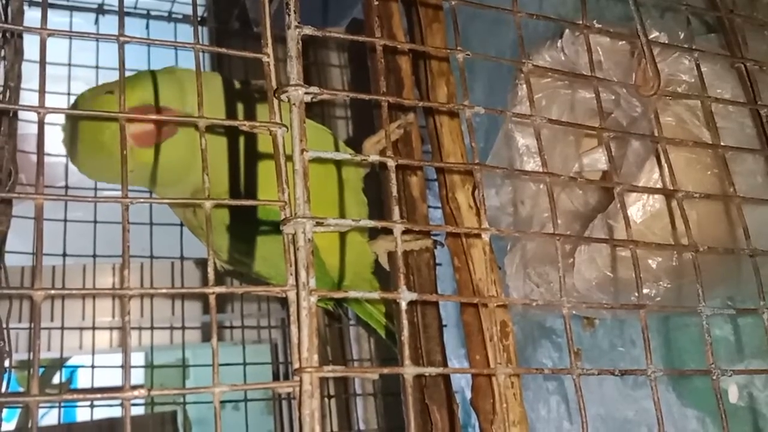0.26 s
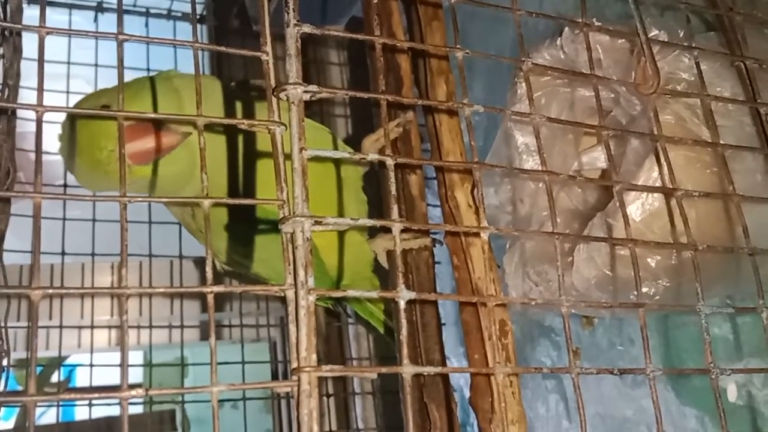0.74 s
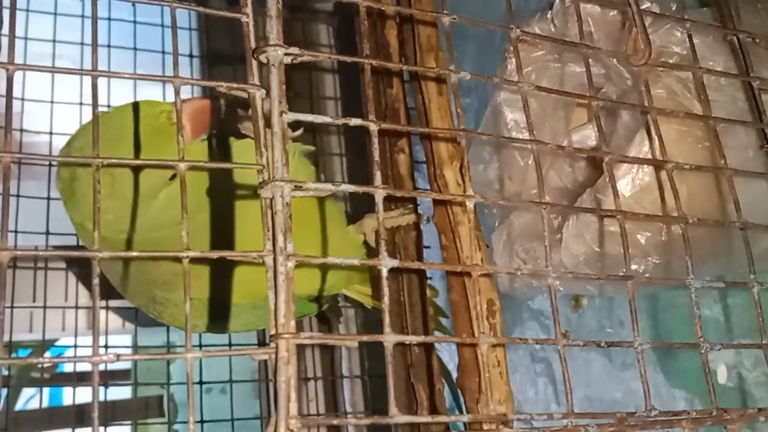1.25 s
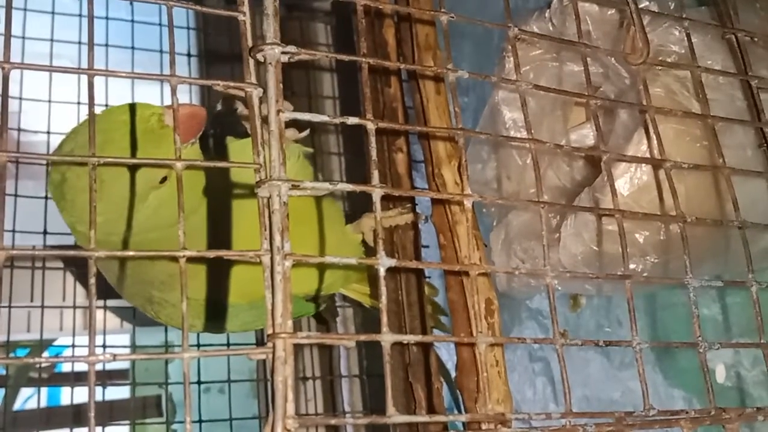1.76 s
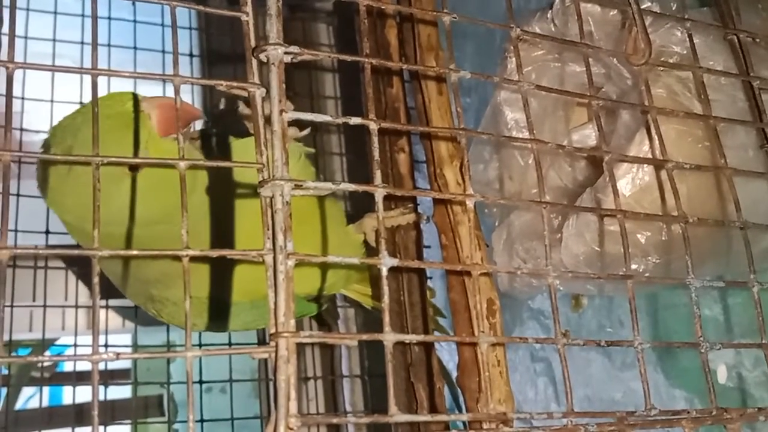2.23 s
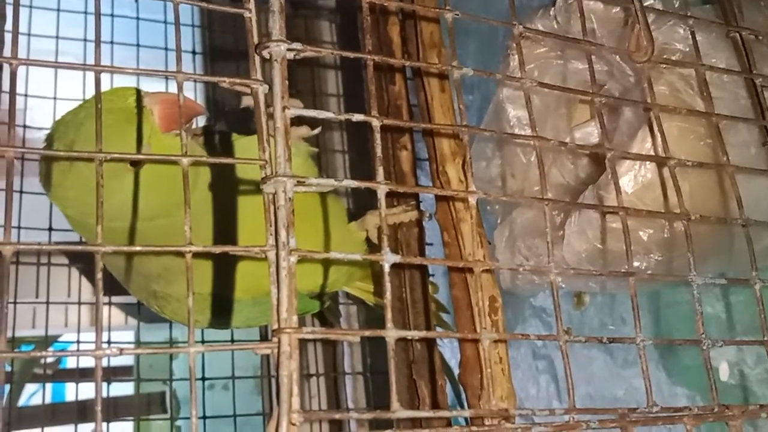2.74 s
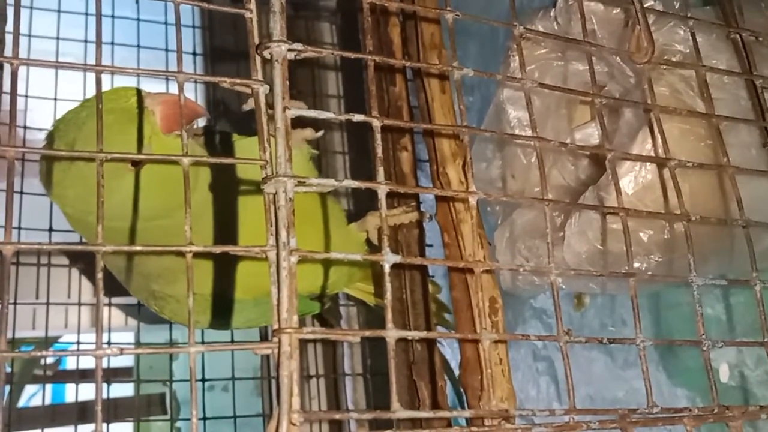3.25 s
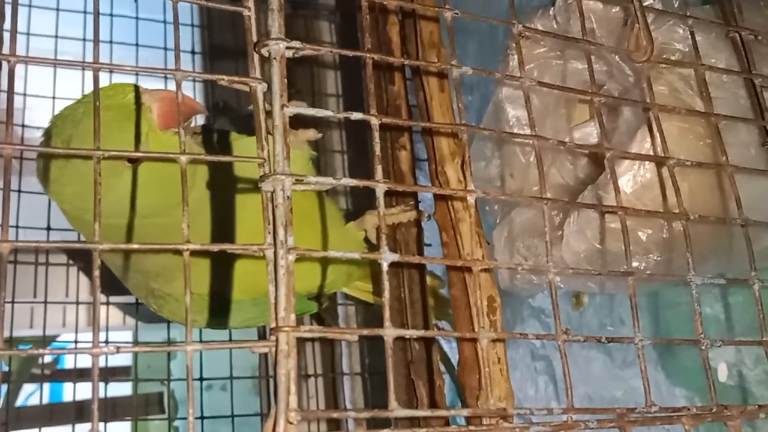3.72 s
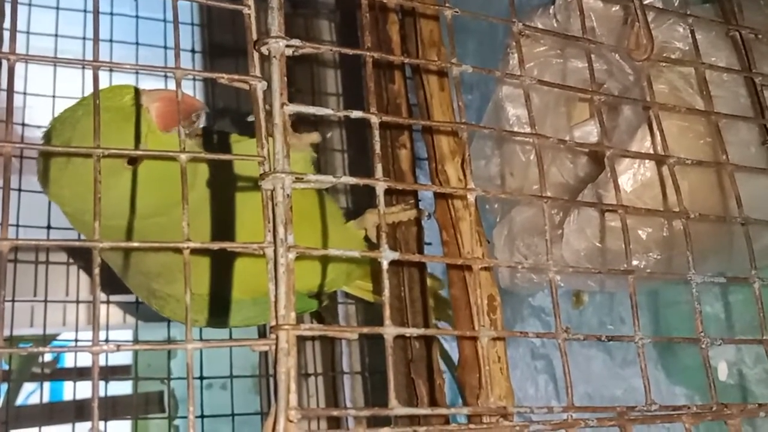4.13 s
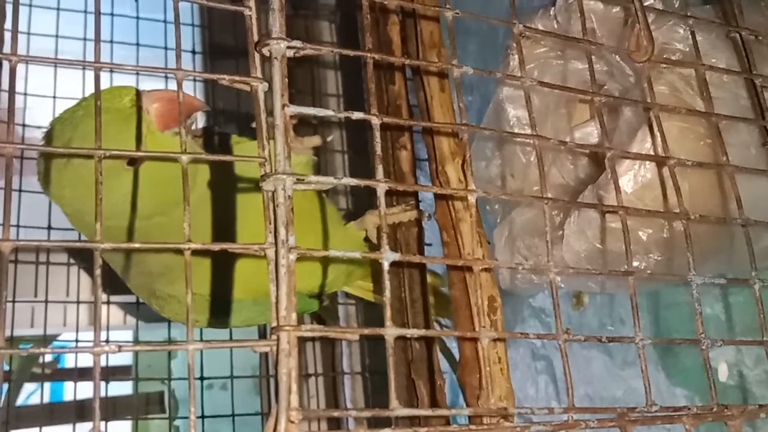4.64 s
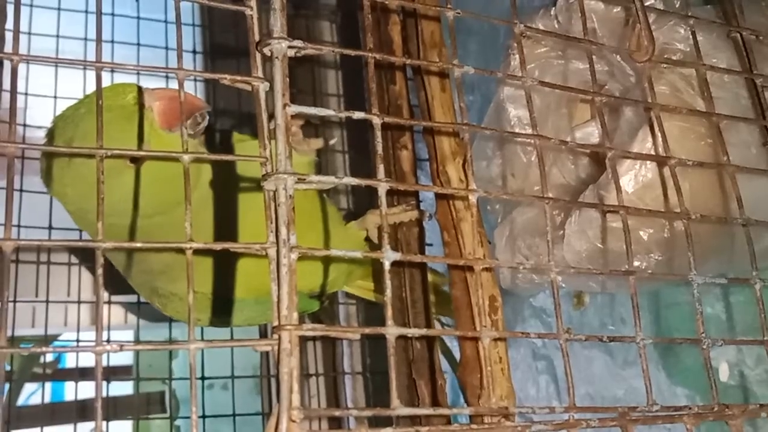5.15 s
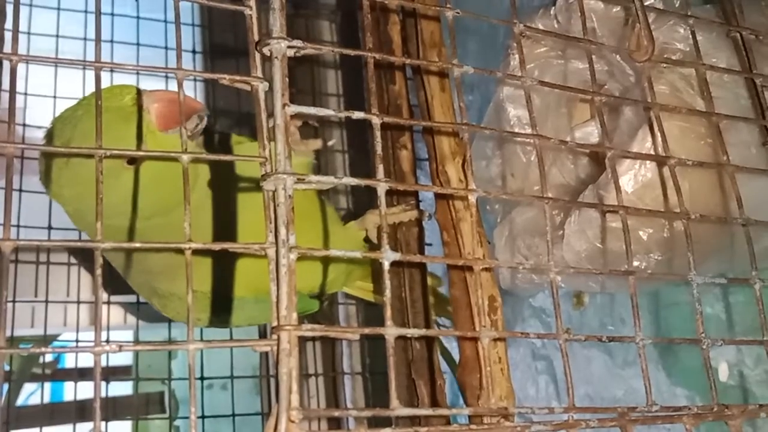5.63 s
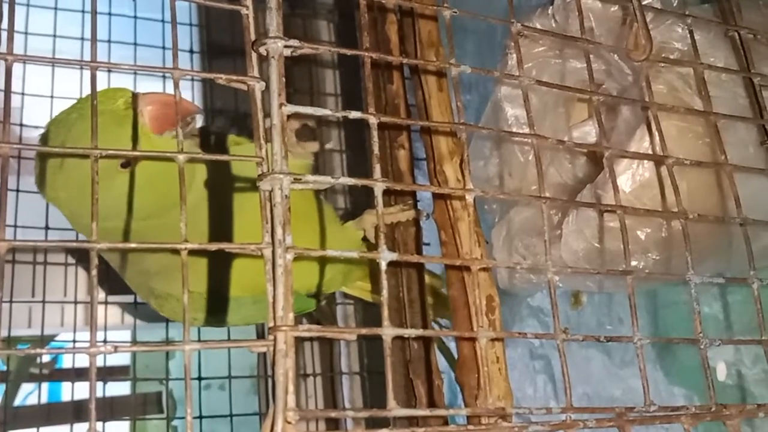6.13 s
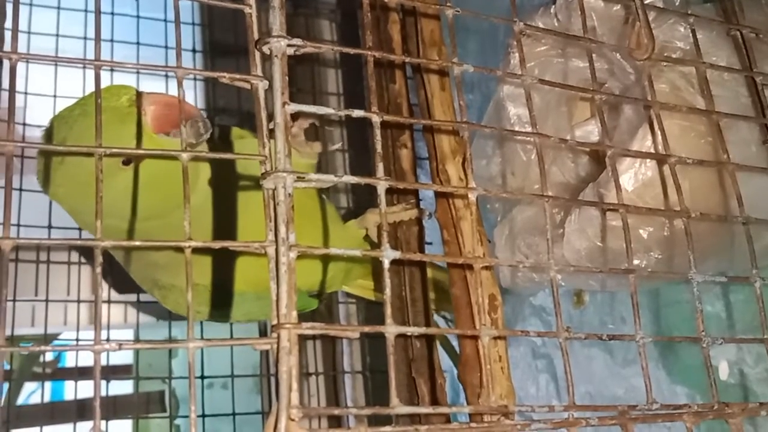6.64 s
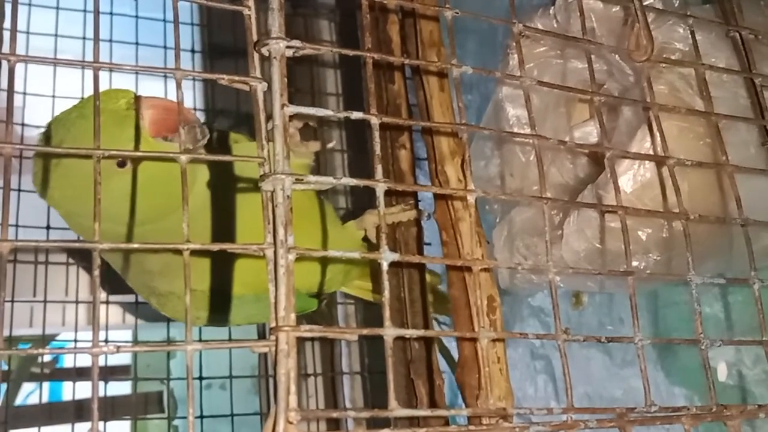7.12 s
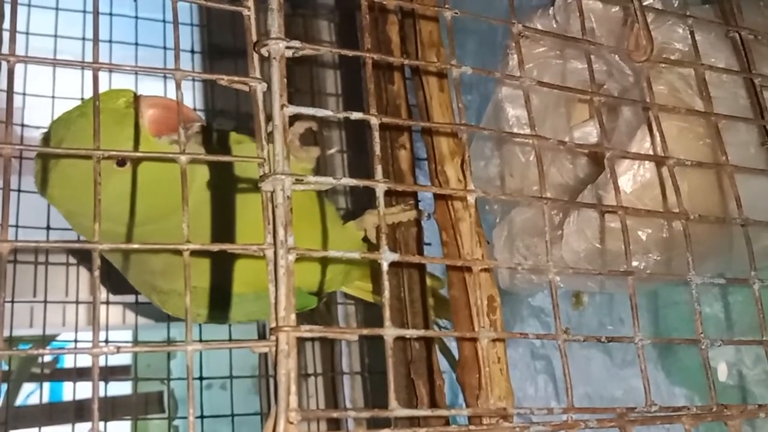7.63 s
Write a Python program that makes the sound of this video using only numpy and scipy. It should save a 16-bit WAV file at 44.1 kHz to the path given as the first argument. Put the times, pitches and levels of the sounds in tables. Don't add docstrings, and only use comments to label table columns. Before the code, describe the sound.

A caged parakeet is heard close to a handheld phone, with faint far street hiss, hollow hum and low rumble that pump with its voice. A soft handling bump opens the scene. At 0.9 s comes a quick trill of three pulses, then small, muted falling chirps near 1.6, 2.3 and 2.85 s. A throaty cluck at 3.0 leads to a faint low whistle at 3.4, a stronger cluck at 3.6 and a high chip at 3.75. Hoarse rasps alternate with two upward whistles at 4.0 and 4.3-4.5 s, then a soft chirp at 4.75. Loud calls follow at 5.0-5.4 and 5.6-6.05 s, dipping, swooping up and plunging. Two higher, piercing calls snap in at 6.36 and 7.1 s, climbing then dropping, with clucks before them and beak ticks. Near walls add a short, bright smear; fingers thump softly around 5.6-6.3 s. A last cluck ends it at 7.8 s.

```python
import sys
import numpy as np
from scipy import signal
from scipy.fft import rfft, irfft
from scipy.io import wavfile
from scipy.ndimage import uniform_filter1d, minimum_filter1d, map_coordinates

SR = 44100
rng = np.random.default_rng(int(sys.argv[2]) if len(sys.argv) > 2 else 0)


def digitize_waveform(pressure):
    field = np.atleast_2d(pressure).T
    bounded = np.clip(field, -1, 1)
    quanta = np.round(bounded * 32767).astype(np.int16)
    wavfile.write(sys.argv[1], SR, quanta)


def how_loud(loudness_db):
    steps = np.asarray(loudness_db, float) / 20
    return 10 ** steps


N = 347508

# frequency in Hz, level in dB per Hz.
STREET_HISS = [(500, -40), (700, -20), (1000, -8), (1400, 0), (2000, -2), (2500, -18), (3400, -20),
               (4450, -24), (4800, -35), (5400, -31), (7600, -24), (8800, -30), (9300, -60), (16000, -72)]
# frequency in Hz, level in dB per Hz.
STREET_HUM = [(150, -49.5), (220, -10), (320, 12.5), (420, -23), (520, -30.5), (700, -41), (2500, -91.5)]
# frequency in Hz, level in dB per Hz.
LOW_RUMBLE = [(20, -38.5), (40, -30.5), (65, -8.5), (90, 2), (118, 10.5), (150, -20.5), (220, -23),
              (300, -41.5), (1000, -90.5)]
# frequency in Hz, level in dB per Hz.
GAP_AIR = [(350, -38), (480, -8.5), (650, 25), (850, -18), (1100, -36.5), (2500, -79.5)]
# time in seconds, level in dB.
TRAFFIC_SWELL = [(0, -76), (.3, -71.5), (.9, -67), (1.5, -73.5), (2.75, -78), (3.4, -71.5), (3.75, -60),
                 (4.0, -76.5), (4.4, -49.5), (4.6, -66.5), (5, -58.5), (5.6, -59.5), (6.1, -78), (6.4, -62),
                 (6.6, -90), (7.15, -60.5), (7.3, -75), (7.88, -77)]
# centre in seconds, rumble level in dB, half width in seconds.
HAND_SHIFTS = [(.1, -67, 0.125), (2.39, -45, 0.013), (2.86, -56, 0.018), (4.45, -65.5, 0.11),
               (5.08, -63.5, 0.071), (5.618, -49, 0.064), (5.949, -59.5, 0.2), (6.381, -71, 0.103),
               (6.889, -65, 0.0387)]
# start in seconds, peak in dB, pitch in Hz, half width in seconds.
FINGER_THUMPS = [
    (0.045, -31, 95.8, 0.0051),
    (0.159, -63, 113, 0.016),
    (5.57, -32.5, 116, 0.0055),
    (5.701, -45.5, 85, 0.03),
    (6.127, -50.5, 108.8, 0.008),
    (6.321, -42.5, 72.7, 0.0127),
]
# start in seconds, level in dB.
BEAK_TICKS = [(.056, -48), (5.14, -25), (6.54, -33), (7.16, -31), (6.46, -27), (6.48, -21), (7.22, -21)]

# delay in seconds, level in dB.
WALL_ECHOES = [(.0088, -16), (.0122, -14), (.0157, -18), (.0187, -19), (.0244, -17)]
# frequency in Hz, time to fall 60 dB in seconds.
WALL_DECAY = [(500, .1), (1500, .27), (3000, .32), (5000, .27), (12000, .25)]
# frequency in Hz, level in dB.
REFLECTION_COLOUR = [(600, -10), (900, -7), (1500, 0), (2400, -2), (3200, 1), (4500, 1), (6000, -1),
                     (8000, 0), (12000, -3)]
# start in seconds, gain in dB, time held in seconds.
SUPPRESSOR_BITES = [(.981, -3, .5), (1.0, -3, .5), (3.1, -7, .2), (3.5, -5, .09), (3.8, -6, .085),
                    (4.14, -6, .05), (4.19, -10, .025), (4.53, -3, .09), (4.57, -6, .05), (5.455, -3, .04),
                    (5.495, -7, .06), (6.08, -5, .22), (6.782, -6, .25), (7.541, -7, .28)]

# start in seconds, peak in dB, length in seconds, first and last Hz, roughness 0-1.
LEAD_IN_BREATH = (.878, -55, .045, 1050, 1100, .7)
# start in seconds, peak in dB, length in seconds.
TRILL_PULSES = [
    (.9215, -17, 0.011),
    (0.9453, -14, 0.012),
    (0.9705, -17, 0.011),
]
# frequency in Hz, level in dB.
TRILL_THROAT = [(500, -23), (1050, 0), (2150, 6.5), (3200, 1.5), (4300, 5), (5400, -15), (7300, -11.5),
                (9500, -12.5), (16000, -43.5)]
# time in seconds, pitch in Hz, effort in dB, tongue 0 forward to 1 back,
# brightness of the higher partials in dB.
SOFT_CHIRPS = [
    [(1.54, 680, -74, 0.2, -13.5), (1.6, 744, -75, 0.7, -26.5), (1.64, 822, -70, 1, -26),
     (1.66, 803.4, -41.5, 0.54, -18), (1.69, 826, -30, 0.34, -16), (1.701, 772, -32, 0.48, -11),
     (1.712, 684, -36, 0.83, -20.5)],
    [(2.236, 666, -75, 0.24, -12.5), (2.296, 734, -77.5, 0.75, -24), (2.336, 824, -69, 0.9, -26),
     (2.356, 818, -40, 0.4, -25), (2.385, 820, -30, 0.16, -16), (2.396, 786, -34.5, 0.7, -9.5),
     (2.407, 676, -38, 0.8, -14)],
    [(2.803, 920, -71, 0.6, -26), (2.82, 885, -55, 1, -14), (2.86, 850, -33, 0.26, -26),
     (2.895, 858, -35.5, 0.42, -27), (2.92, 820, -70, 0.95, -24)],
    [(4.73, 940, -46, 1, -18), (4.75, 885, -47.5, 0.99, -5.5), (4.79, 850, -35.5, 0.52, -17),
     (4.815, 742, -34.5, 0.38, -21), (4.838, 600, -47.5, 0.8, -24)],
]
# frequency in Hz, level in dB.
SOFT_TONGUE_BACK = [(600, 4.5), (900, 9.5), (1600, 8.5), (2500, -9)]
# frequency in Hz, level in dB.
SOFT_TONGUE_FORWARD = [(600, 7), (900, -16), (1600, -11.5), (2500, 2.5)]
# levels in dB of partials 1, 2 and 3.
SOFT_MEMBRANES = [-3, -3.5, -9]
# frequency in Hz, level in dB.
SHUT_BEAK = [(3200, -16), (4600, -11), (5500, -15), (7000, 9), (9000, -10), (11500, -18), (12500, -32.5)]
# start in seconds, peak in dB, length in seconds, first and last Hz.
THROAT_RASPS = [
    (1.699, -47, 0.017, 805, 636),
    (2.389, -59, .024, 764, 762),
    (3.887, -28.5, 0.057, 539, 616),
    (4.214, -31, 0.075, 547, 506),
    (4.619, -28, 0.033, 612, 606),
]
# frequency in Hz, level in dB.
RASP_THROAT = [(400, -24.5), (560, 2), (900, -3.5), (1600, 4), (2300, 9.5), (3300, -10.5), (4600, -16),
               (5600, -53), (7000, -8.5), (8200, -28.5), (10000, -21.5), (12000, -45)]
# start in seconds, peak in dB, length in seconds, share of the usual pitch.
THROAT_CLUCKS = [
    (3.043, -18.5, .00924, 1),
    (3.602, -14, .013, .89),
    (4.941, -20.5, .0076, 1),
    (5.564, -17.5, .009, 1),
    (6.311, -19.5, .01, .98),
    (7.04, -21, .0085, 1),
    (7.834, -20, .0087, 1),
]
# frequency in Hz, level in dB.
CLUCK_THROAT = [(400, -32.5), (650, -8), (1200, -10), (1700, -22), (2400, 7), (3200, -8.5), (4200, -7.5),
                (5500, -15), (7200, -17.5), (9000, -28.5), (12000, -36), (16000, -56.5)]
# start in seconds, peak in dB, length in seconds, first and last Hz.
THROAT_MURMURS = [
    (3.305, -56.5, 0.12, 1072, 1130),
    (4.975, -40, 0.21, 628, 682),
    (5.61, -40.5, 0.19, 669, 620),
]
# frequency in Hz, level in dB.
HALFWAY_LINES = [(500, -27), (700, -20.5), (1900, -13.5), (3200, -6.5), (4400, -12), (5600, -6),
                 (7000, -23.5), (9000, -39.5)]

# frequency in Hz, level in dB.
LOUD_TONGUE_BACK = [(900, 26.5), (1300, -20), (1800, -18), (2300, 18), (2900, 10), (3700, 5), (4500, -24),
                    (6300, -7.5), (7000, -8.5)]
# frequency in Hz, level in dB.
LOUD_TONGUE_FORWARD = [(900, -33), (1300, 11), (1800, 25.5), (2300, -26), (2900, -25), (3700, -11),
                       (4500, 23), (6300, 12), (7000, 5.5)]
# time in seconds, pitch in Hz, effort in dB, tongue 0 forward to 1 back,
# brightness of the higher partials in dB.
SHORT_WHISTLES = [
    [(3.345, 1062, -86, 1.0, -21), (3.37, 992, -64, 1.0, 20), (3.4, 918, -53.5, 0.75, 19),
     (3.43, 876.7, -50, 0.65, 18), (3.46, 863.3, -44.5, 0.59, 18), (3.485, 868, -46.5, 0.63, 10.5),
     (3.5, 950, -76, 0.85, -12)],
    [(3.68, 2035, -73, 0.83, 3), (3.71, 2040, -49.5, 0.91, -5.5), (3.74, 2190, -41.5, 0.7, -18),
     (3.758, 2274, -31.5, 0.74, -11.5), (3.775, 2130, -55, 1, -14)],
]
# frequency in Hz, level in dB.
BEAK_SHORT = [(3000, 7.5), (3950, -0.5), (4660, 7.5), (5400, -1.5), (6260, -5), (7000, -13), (8800, -17),
              (10300, -22), (11500, -40), (15500, -58)]
# time in seconds, pitch in Hz, effort in dB, tongue 0-1, brightness in dB.
RISING_CALLS = [
    [(4.01, 1223, -48, 0.41, -30), (4.03, 1184, -40, 0.42, -23), (4.05, 1271, -32, 0.52, -11),
     (4.07, 1404, -30, 0.5, -10), (4.082, 1660, -33.5, 0.65, -8), (4.092, 1794, -36.5, 0.61, -0.5)],
    [(4.3, 1275, -42, 0.28, -31), (4.31, 1186, -40.5, 0.47, -24.5), (4.345, 1191, -36, 0.4, -28.5),
     (4.41, 1257, -29, 0.33, -7), (4.44, 1340, -28, 0.49, -6.5), (4.465, 1410, -23.5, 0.5, -2),
     (4.497, 1437, -29.5, 0.52, -4), (4.51, 1506, -46, 0.67, -14)],
]
# levels in dB of partials 1, 2 and 3.
RISING_MEMBRANES = [2.5, 17.5, 2]
# frequency in Hz, level in dB.
BEAK_RISING = [(4500, 3), (5300, -10), (6300, -10), (7100, -11.5), (8500, -21.5), (10000, -6.5),
               (11500, -28), (13000, -34), (15500, -32)]
# time in seconds, pitch in Hz, effort in dB, tongue 0-1, brightness in dB.
LONG_LOW_CALLS = [
    [(4.978, 1548, -55.5, 0.31, -4.5), (5.01, 1290, -49, 0.021, -31), (5.085, 1220, -37, 0.099, -4),
     (5.13, 1148, -30.5, 0.5, 7), (5.18, 1236, -23.5, 0.58, -3), (5.255, 1740, -30, 0.53, -2),
     (5.29, 1819, -37.5, 0.28, 6.5), (5.36, 1571, -26, 0.56, -4), (5.41, 1370, -25, 0.61, -5.5)],
    [(5.612, 1426, -59, 0, 2), (5.65, 1339, -49, 0.015, 0.5), (5.7, 1200, -36.5, 0.14, 1),
     (5.74, 1203, -30.5, 0.36, 14), (5.79, 1328, -24.5, 0.58, -2), (5.86, 1703, -27, 0.58, -1.5),
     (5.91, 1958, -41, 0.12, 4), (5.985, 1619, -26.5, 0.61, -5), (6.04, 1399, -23.5, 0.58, -0.5)],
]
# frequency in Hz, level in dB.
BEAK_LOW = [(3000, 15), (4800, 10), (5600, -3), (6300, -10), (7200, -12.5), (8100, -41), (8900, -17),
            (9600, -26), (10800, -16.5), (12700, -36.5), (13700, -39), (15500, -34.5)]
# frequency in Hz, level in dB.
LOW_PLUNGE_THROAT = [(450, -35), (650, -5), (900, -17), (1500, -12), (2000, -14), (2450, 9), (3000, -6.5),
                     (4200, -15), (6000, -23.5), (8800, -23), (11000, -32), (15500, -53)]
# time in seconds, pitch in Hz, effort in dB, tongue 0-1, brightness in dB.
LONG_HIGH_CALLS = [
    [(6.365, 2009, -43.5, 0.0, -1), (6.385, 1906, -38, 0.19, 7.5), (6.42, 1830, -36.5, 0.3, 13),
     (6.44, 1776, -26, 0.58, -1), (6.48, 1893, -30, 0.53, 6), (6.585, 2331, -19.5, 0.68, -9.5),
     (6.61, 2237, -23, 0.64, -5), (6.655, 1910, -37, 0.57, 3), (6.738, 1481, -32, 0.54, 3.5)],
    [(7.098, 2125, -41, 0.88, -31), (7.112, 1844, -47.5, 0.075, 11), (7.15, 1765, -30, 0.56, 2),
     (7.185, 1792, -28.5, 0.46, 8.5), (7.225, 1879, -30.5, 0.6, 3), (7.262, 2091, -24.5, 0.46, -1),
     (7.352, 2245, -22, 0.67, -5.5), (7.41, 1936, -37.5, 0.52, 5), (7.498, 1451, -30.5, 0.58, 5.5)],
]
# levels in dB of partials 1, 2 and 3.
HIGH_MEMBRANES = [-3.5, 17.5, 3]
# frequency in Hz, level in dB.
BEAK_HIGH = [(1760, -30), (3000, 13.5), (3950, -1), (4660, 12), (6260, -0.5), (6940, 1.5), (8290, -26),
             (10600, -25), (12700, -49.5), (14300, -44), (15500, -34)]
# start in seconds, peak in dB, length in seconds,
# first and last Hz, roughness 0-1.
HIGH_SNAPS = [
    (6.361, -19, 0.017, 2473, 1986, 0.3),
    (7.095, -26.5, 0.019, 2406, 1986, 0.1),
]
# frequency in Hz, level in dB.
HIGH_PLUNGE_THROAT = [(450, -21), (650, -9), (900, -21), (1500, -15), (2200, -6.5), (2900, 4), (4000, -1.5),
                      (5500, -24), (7500, -7.5), (9000, -28), (10000, -44), (15000, -35)]
# centre in Hz, width in Hz, depth in dB.
MIC_PORT_DIPS = [(6300, 216, -9.5), (7760, 290, -7.5), (13600, 400, -6.5)]


def unit(x):
    return x / np.sqrt(np.mean(x ** 2) + 1e-20)


def along(points, hz):
    f, value = np.transpose(points)
    return np.interp(np.log(hz + 1), np.log(f + 1), value)


def wobble(size, rate):
    knots = rng.standard_normal(size // 20 + 4)
    return map_coordinates(knots, [np.arange(size) * min(rate, 2000) / SR])


def add(track, s, x):
    part = track[round(s * SR):][:len(x)]
    part += x[:len(part)]


def loudness_db(x, linger_s):
    span = round(.011 * SR)
    power = uniform_filter1d(uniform_filter1d(x ** 2, span), span)
    keep = np.exp(-1 / (linger_s * SR))
    return 10 * np.log10(np.abs(signal.lfilter([1 - keep], [1, -keep], power)) + 1e-10)


def suppressor_db(voice):
    low_voice_hz, opens_from_db, opens_db = 1420, -75, 11.5
    ducks_from_db, ducks = -30, .5
    hz = np.fft.rfftfreq(N, 1 / SR)
    low = irfft(rfft(voice) / (1 + (hz / low_voice_hz) ** 12), N)
    opens = np.clip((loudness_db(low, .005) - opens_from_db) / 18, 0, 1)
    return opens_db * opens - ducks * np.maximum(loudness_db(voice, .0036) - ducks_from_db, 0)


def rush(spectrum, patchy_db):
    hz, _, z = signal.stft(rng.standard_normal(N), SR, nperseg=512)
    field = uniform_filter1d(rng.standard_normal(z.shape), size=2, axis=0)
    field = uniform_filter1d(field, size=15, axis=1)
    z = z * how_loud(patchy_db * unit(field) + along(spectrum, hz)[:, None])
    return unit(signal.istft(z, SR, nperseg=512)[1][:N])


def street(voice):
    rest_hiss_db, rest_rumble_db, upper_hz, upper_opens = -65.5, -79.5, 2600, .6
    now, gate_db = np.arange(N) / SR, suppressor_db(voice)
    hiss_db = rest_hiss_db + gate_db
    hiss = rush(STREET_HISS, patchy_db=4.5)
    upper = irfft(rfft(hiss) * (np.fft.rfftfreq(N, 1 / SR) > upper_hz), N)
    upper_db = rest_hiss_db + np.minimum(gate_db, upper_opens * gate_db + 2)
    hiss = how_loud(hiss_db) * (hiss - upper) + how_loud(upper_db) * upper
    air = how_loud(-92.5 + 1.57 * (hiss_db + 64.5)) * rush(GAP_AIR, patchy_db=2)
    hum_db = np.interp(now, *np.transpose(TRAFFIC_SWELL)) + .12 * gate_db
    hum = how_loud(hum_db) * rush(STREET_HUM, patchy_db=4.8)
    grip = sum(how_loud(db) * np.exp(-((now - s) / half) ** 2) for s, db, half in HAND_SHIFTS)
    rumble = (how_loud(rest_rumble_db + .7 * gate_db) + grip) * rush(LOW_RUMBLE, patchy_db=4)
    return hiss + air + hum + rumble


def thumps():
    out, t = np.zeros(N), np.arange(SR // 10) / SR - .017
    for s, db, hz, half in FINGER_THUMPS:
        add(out, s, how_loud(db + 2) * np.exp(-(t / half) ** 2) * np.cos(2 * np.pi * hz * t))
    return out


def ticks():
    out, t = np.zeros(N), np.arange(200) / SR
    for s, db in BEAK_TICKS:
        click = np.diff(uniform_filter1d(rng.standard_normal(len(t) + 1), size=7))
        add(out, s, how_loud(db - 60 * t / .0033) * click)
    return out


def walls(x, dense_db, held_s, late_db):
    hz, t, z = signal.stft(rng.standard_normal(SR // 2), SR, nperseg=128)
    tail = signal.istft(z * how_loud(-60 * t / along(WALL_DECAY, hz)[:, None]), SR, nperseg=128)[1]
    age = np.arange(len(tail)) / SR
    tail = tail * how_loud(late_db * np.clip((age - held_s) / .0035, 0, 1)) * np.clip(age / .006, 0, 1)
    tail = how_loud(dense_db) * tail / np.linalg.norm(tail)
    for k, (delay, db) in enumerate(WALL_ECHOES):
        tail[round(delay * SR)] += (-1) ** k * how_loud(db)
    coloured = irfft(rfft(x) * how_loud(along(REFLECTION_COLOUR, np.fft.rfftfreq(N, 1 / SR))), N)
    now, split = np.arange(N) / SR, np.clip(age / held_s - .5, 0, 1)
    far = signal.fftconvolve(coloured, tail * split)[:N]
    near = signal.fftconvolve(coloured, tail * (1 - split))[:N]
    wet = near + map_coordinates(far, [(now + .000032 * wobble(N, 300)) * SR])
    bite_db = np.zeros(N)
    for s, db, held in SUPPRESSOR_BITES:
        deeper = 1 + .8 * np.exp(-np.abs(now - s) / .02)
        bite_db += db * np.clip((now - s) / .0019, 0, 1) * (now < s + held) * deeper
    flutter_db = 1.8 * wobble(N, 70)
    return how_loud(bite_db + flutter_db) * wet


def partials(pitch):
    k = np.arange(1, 15500 // pitch.min() + 1)[:, None]
    phase = k * 2 * np.pi * np.cumsum(pitch) / SR + k * k
    return k * pitch, np.sin(phase) * (k * pitch < 16000)


def bursts(rows, throat, rise, fall, bend=.62):
    out = np.zeros(N)
    for s, db, length, first_hz, last_hz, rough in rows:
        u = np.linspace(0, 1, round(length * SR))
        hz, waves = partials(first_hz + (last_hz - first_hz) * u ** bend)
        share = np.clip(rough * hz / 1500, 0, 1)
        breath = np.array([wobble(len(u), 700) for _ in hz])
        waves *= np.sqrt(1 - share) + np.sqrt(share) * breath
        tone = unit((how_loud(along(throat, hz)) * waves).sum(axis=0))
        shape = np.minimum(u / rise, 1) * np.minimum((1 - u) / (1 - rise), 1) ** fall
        add(out, s, how_loud(db - 7) * shape * tone)
    return out


def trill():
    pulses = [(*row, 1140, 990, .13) for row in TRILL_PULSES]
    lead_in = bursts([LEAD_IN_BREATH], TRILL_THROAT, rise=.07, fall=.15)
    return lead_in + bursts(pulses, TRILL_THROAT, rise=.12, fall=1.6)


def sung(tables, back, forward, source_db, open_beak, low_bright_db, widest, jitter, breath, edge_s):
    dulls_from_db, dulls, dull_hz = -7, .9, 3700
    haze_share, haze_from_hz, haze_full_hz = .3, 3500, 11000
    out = np.zeros(N)
    for rows in tables:
        s, pitch, effort_db, tongue, bright_db = np.transpose(rows)
        t = np.arange(s[0], s[-1], 1 / SR)
        glide = uniform_filter1d(np.interp(t, s, pitch), size=len(t) // 14, mode="nearest")
        hz, waves = partials(glide * (1 + jitter * wobble(len(t), 248.7)))
        lift = np.clip(np.interp(t, s, tongue), 0, 1)
        centres = np.array([[1], [2], [3]]) * glide
        throat_db = lift * along(back, centres) + (1 - lift) * along(forward, centres)
        lower_db = np.interp(t, s, effort_db) + throat_db + np.array(source_db)[:, None]
        upper_db = np.interp(t, s, effort_db + bright_db)
        dullness_db = np.minimum(np.interp(t, s, bright_db) - dulls_from_db, 0)
        lower_db[2] += dulls * np.exp(-((centres[2] - dull_hz) / 700) ** 2) * dullness_db
        gape = np.clip((upper_db + 48) / 9, 0, widest)
        tilt_db = .4 * (lower_db[1] + 20) - low_bright_db * np.log2(glide / 1600)
        shape_db = gape * along(open_beak, hz) + (1 - gape) * along(SHUT_BEAK, hz)
        gains = how_loud(shape_db + gape * tilt_db * np.log2(np.maximum(hz, 6000) / 6000))
        gains[3:] *= how_loud(upper_db) / np.linalg.norm(gains[3:], axis=0)
        gains[:3] = how_loud(lower_db)
        leak = .5 * (1 - gape) * np.clip(hz / 2000 - (.9 if widest else 2.6), 0, 1)
        haze = haze_share * gape * np.clip((hz - haze_from_hz) / (haze_full_hz - haze_from_hz), 0, 1)
        air = breath + haze + leak * (glide < 1600)
        gains *= 1 - air ** 2 + air * np.array([wobble(len(t), 900) for _ in hz])
        gains *= how_loud(np.clip(hz / 2600, 1, 3) * np.array([wobble(len(t), 35) for _ in hz]))
        fade = np.clip(np.minimum(t - t[0], t[-1] - t) / edge_s, 0, 1)
        add(out, s[0], np.sqrt(2) * fade * (gains * waves).sum(axis=0))
    return out


def chirps():
    return sung(SOFT_CHIRPS, SOFT_TONGUE_BACK, SOFT_TONGUE_FORWARD, SOFT_MEMBRANES, BEAK_HIGH, 8,
                widest=0, jitter=.006, breath=.08, edge_s=.004)


def rasps():
    return bursts([(*row, .57) for row in THROAT_RASPS], RASP_THROAT, rise=.3, fall=1.1)


def clucks():
    rows = [(*row, share * 675, share * 618, .2) for *row, share in THROAT_CLUCKS]
    return bursts(rows, CLUCK_THROAT, rise=.68, fall=.69)


def murmurs():
    return bursts([(*row, 1.9) for row in THROAT_MURMURS], HALFWAY_LINES, rise=.03, fall=.37)


def loud_calls(tables, source_db, open_beak, low_bright_db):
    return sung(tables, LOUD_TONGUE_BACK, LOUD_TONGUE_FORWARD, source_db, open_beak, low_bright_db,
                widest=.94, jitter=.0035, breath=.055, edge_s=.003)


def whistles():
    return loud_calls(SHORT_WHISTLES, [5.7, 14.5, 4.5], BEAK_SHORT, 4)


def rising_calls():
    return loud_calls(RISING_CALLS, RISING_MEMBRANES, BEAK_RISING, 8.5)


def doubling():
    out, t = np.zeros(N), np.arange(round(.071 * SR)) / SR
    for rows, db in zip(LONG_LOW_CALLS, [-47.5, -46]):
        s, pitch = np.transpose(rows)[:2]
        half = uniform_filter1d(np.interp(t + s[0], s, pitch), size=1400, mode="nearest") / 2
        hz, waves = partials(half)
        gains = how_loud(along(HALFWAY_LINES, hz) + 3 * np.array([wobble(len(t), 400) for _ in hz]))
        fade = np.clip(np.minimum(t / .00265, (t[-1] - t) / .024), 0, 1)
        lines = (gains * waves)[::2].sum(axis=0)
        add(out, s[0], how_loud(db) * fade * unit(lines))
    return out


def plunges(calls, peaks_db, throat, fall, bend):
    rows = [(call[-1][0] - .003, db, .021, call[-1][1], 600, .05) for call, db in zip(calls, peaks_db)]
    return bursts(rows, throat, rise=.12, fall=fall, bend=bend)


def low_calls():
    calls = loud_calls(LONG_LOW_CALLS, [.5, 17, 4], BEAK_LOW, 8)
    ends = plunges(LONG_LOW_CALLS, [-4, -4.5], LOW_PLUNGE_THROAT, fall=.7, bend=.7)
    return calls + doubling() + ends


def high_calls():
    snaps = bursts(HIGH_SNAPS, TRILL_THROAT, rise=.12, fall=1.6)
    calls = loud_calls(LONG_HIGH_CALLS, HIGH_MEMBRANES, BEAK_HIGH, 8)
    ends = plunges(LONG_HIGH_CALLS, [-8.5, -9], HIGH_PLUNGE_THROAT, fall=.6, bend=.8)
    return snaps + calls + ends


def bird():
    soft = ticks() + trill() + chirps() + rasps() + clucks() + murmurs()
    return soft + whistles() + rising_calls() + low_calls() + high_calls()


def scene():
    voice = bird()
    mono = voice + walls(voice, dense_db=-11.5, held_s=.05, late_db=-5) + street(voice) + thumps()
    return np.array([mono, mono])


def roll_off(x):
    return signal.sosfilt(signal.butter(12, 16270, fs=SR, output="sos"), x)


def record(dry):
    ceiling, span = .88, round(.004 * SR)
    needed = minimum_filter1d(ceiling / np.maximum(np.abs(dry), ceiling), size=span)
    held = dry * uniform_filter1d(needed, size=span)
    hz = np.fft.rfftfreq(N, 1 / SR)
    edges = np.clip((15700 - hz) / 500, 0, 1) / (1 + (55 / (hz + 1)) ** 4)
    port_db = sum(db * np.exp(-((hz - centre) / width) ** 2) for centre, width, db in MIC_PORT_DIPS)
    mix = irfft(rfft(held) * how_loud(port_db) * edges, N)
    return roll_off(mix)


dry = scene()
out = record(dry)
digitize_waveform(out)
```